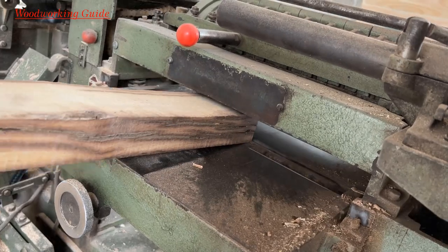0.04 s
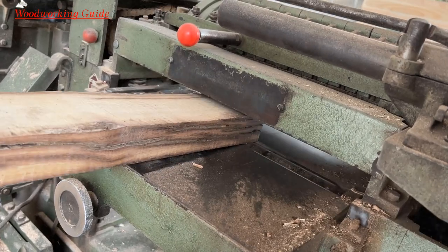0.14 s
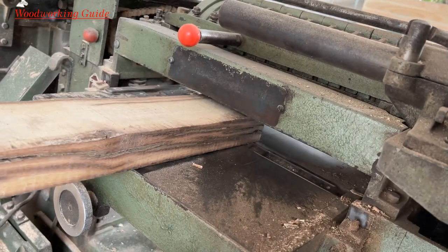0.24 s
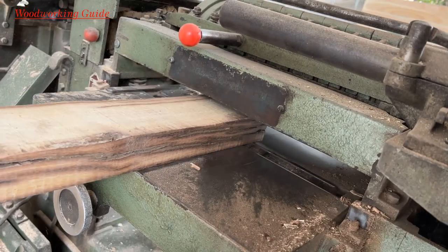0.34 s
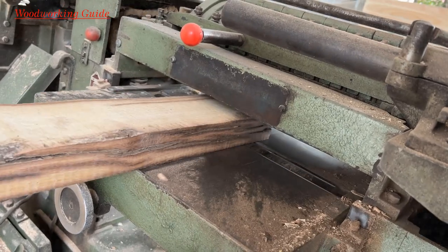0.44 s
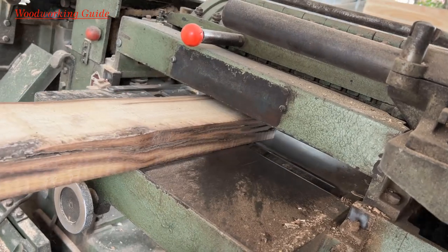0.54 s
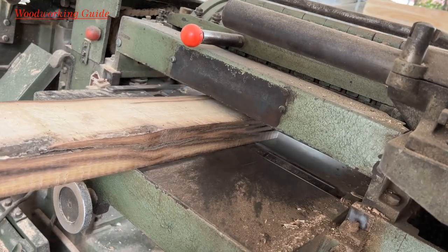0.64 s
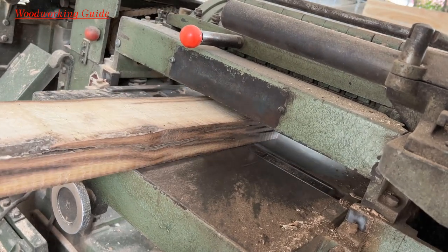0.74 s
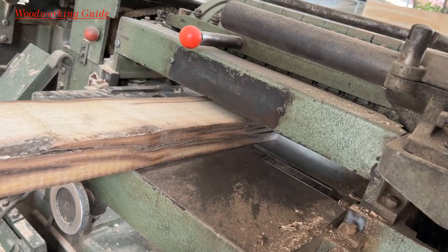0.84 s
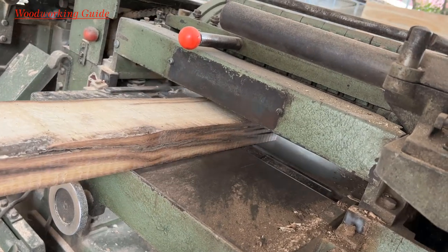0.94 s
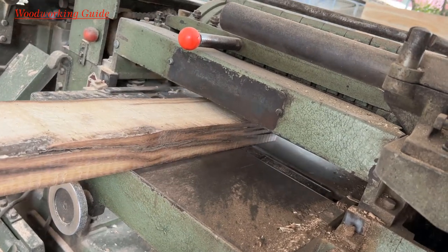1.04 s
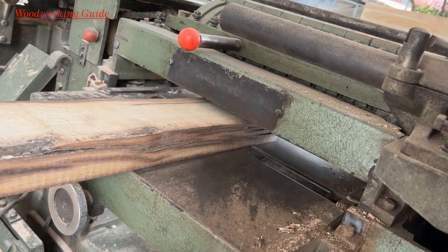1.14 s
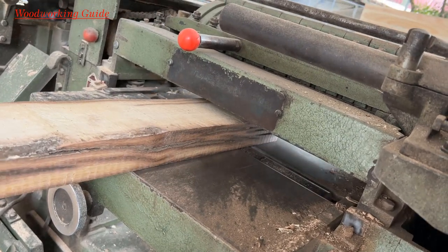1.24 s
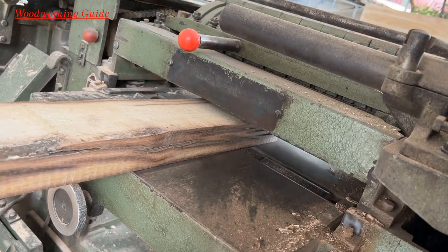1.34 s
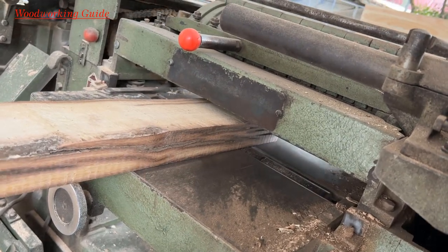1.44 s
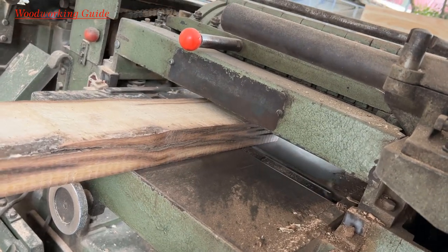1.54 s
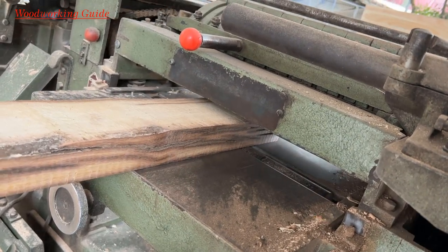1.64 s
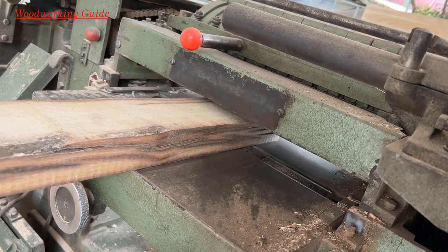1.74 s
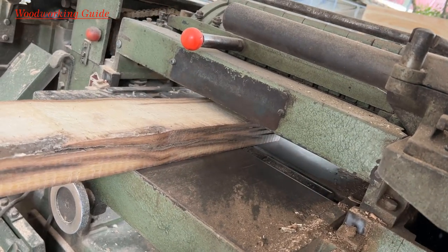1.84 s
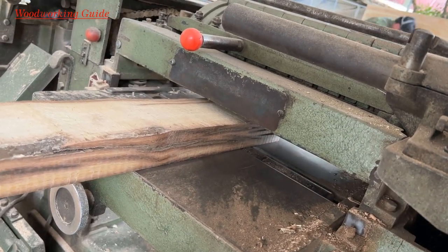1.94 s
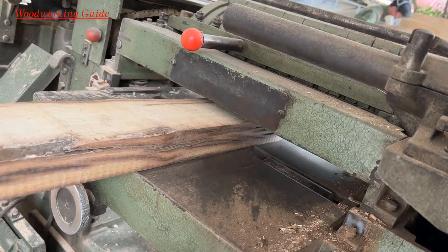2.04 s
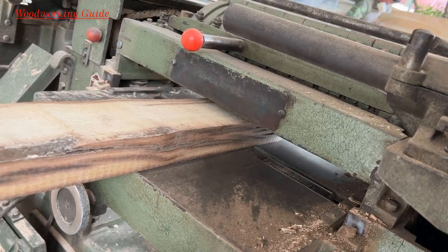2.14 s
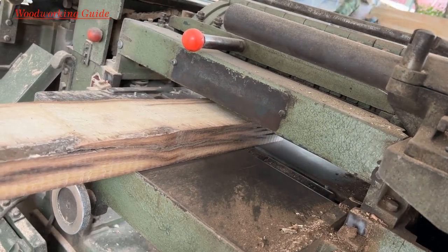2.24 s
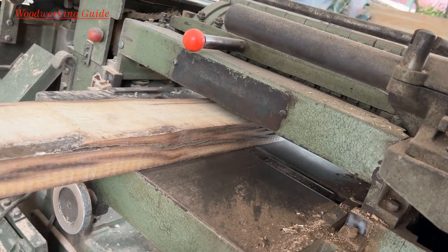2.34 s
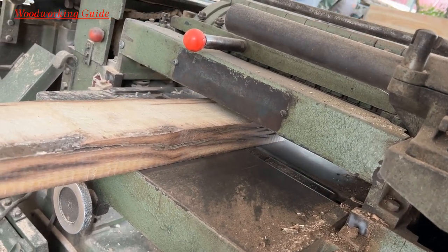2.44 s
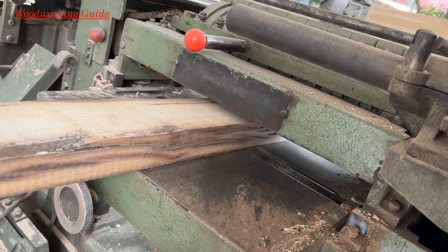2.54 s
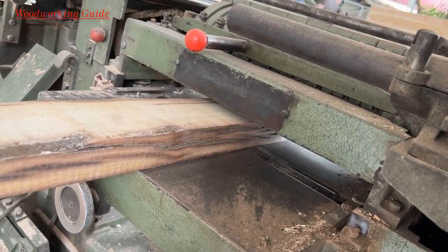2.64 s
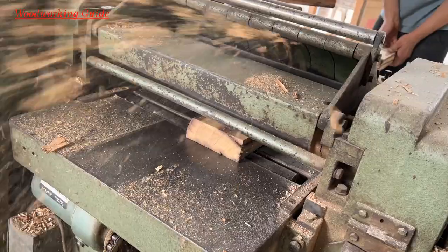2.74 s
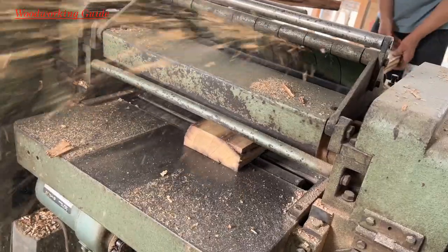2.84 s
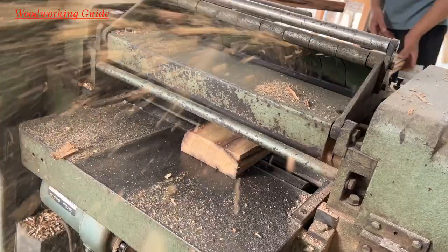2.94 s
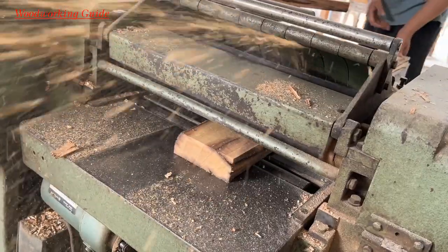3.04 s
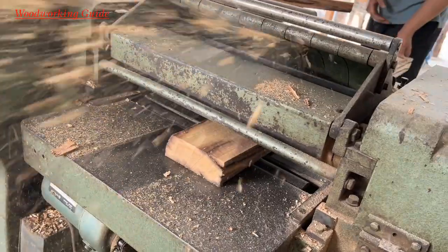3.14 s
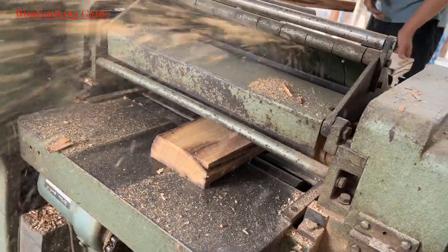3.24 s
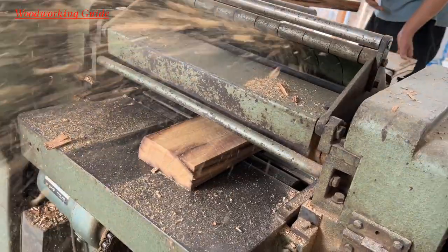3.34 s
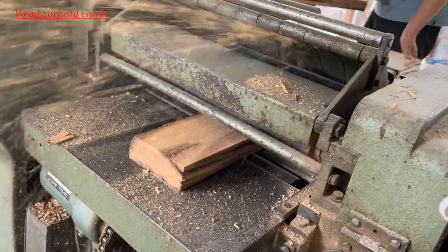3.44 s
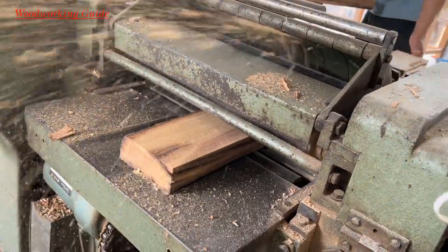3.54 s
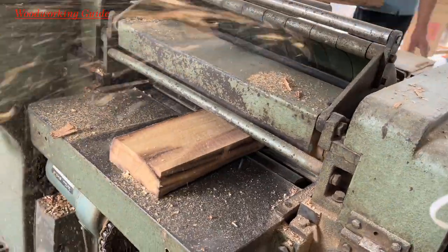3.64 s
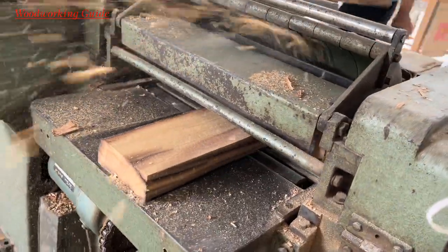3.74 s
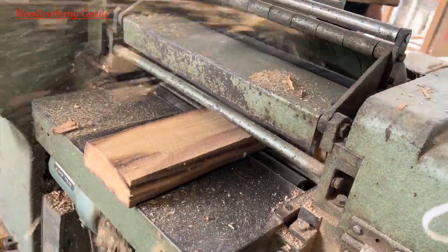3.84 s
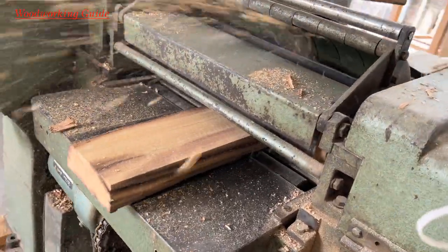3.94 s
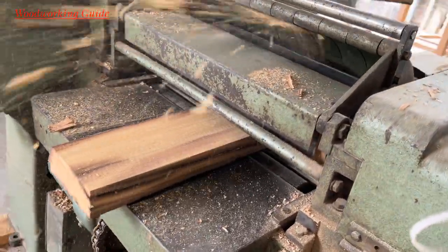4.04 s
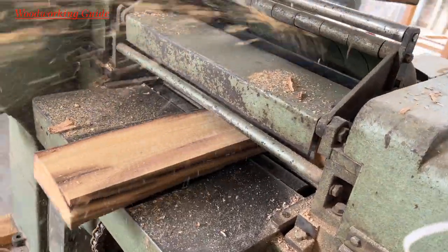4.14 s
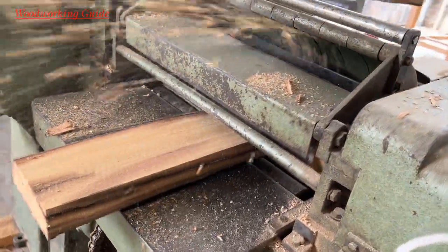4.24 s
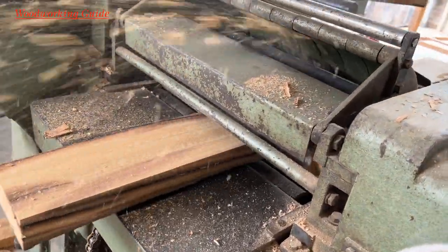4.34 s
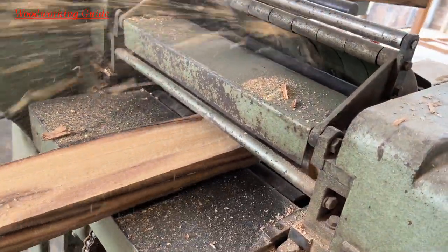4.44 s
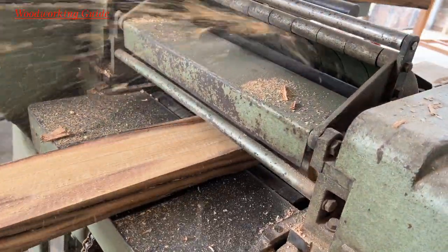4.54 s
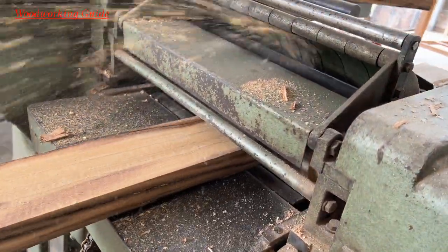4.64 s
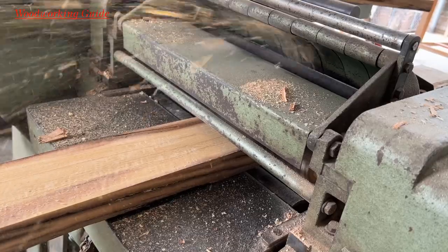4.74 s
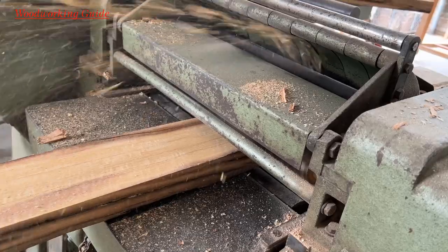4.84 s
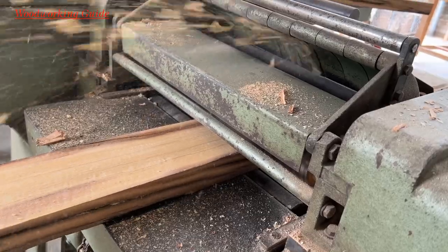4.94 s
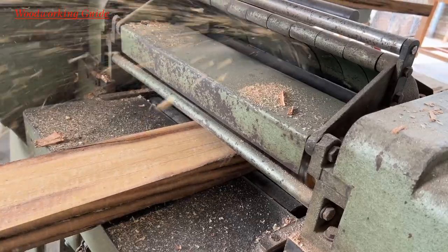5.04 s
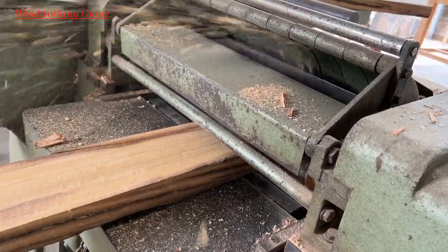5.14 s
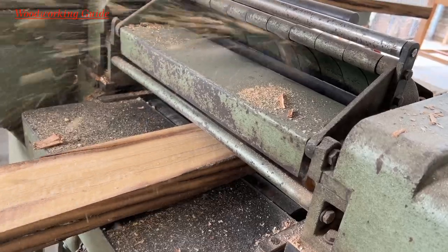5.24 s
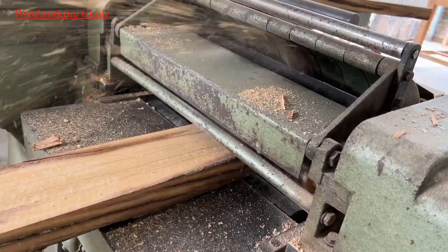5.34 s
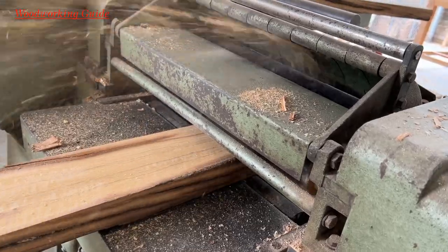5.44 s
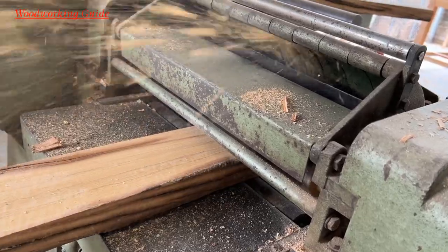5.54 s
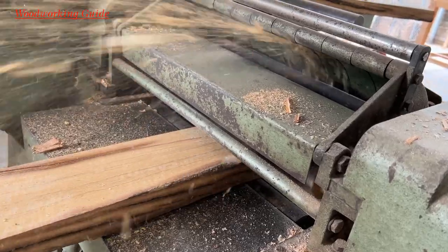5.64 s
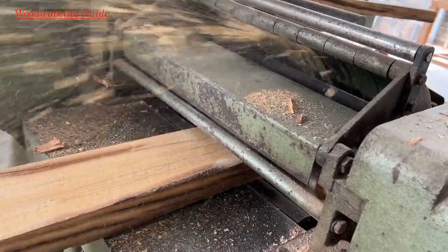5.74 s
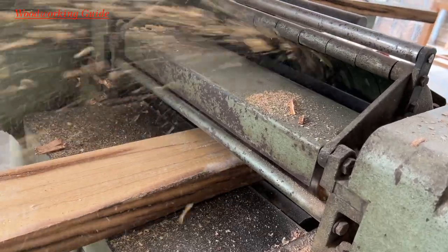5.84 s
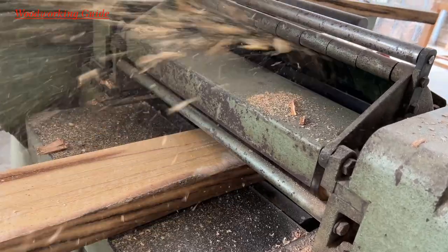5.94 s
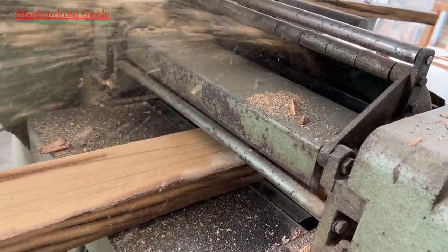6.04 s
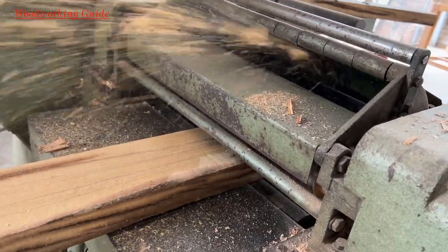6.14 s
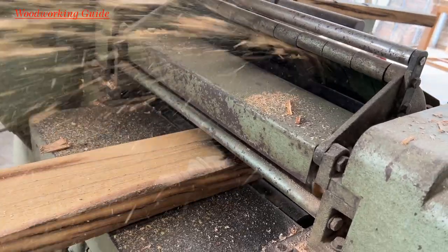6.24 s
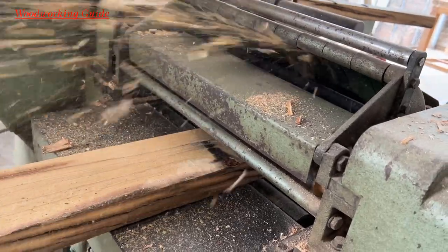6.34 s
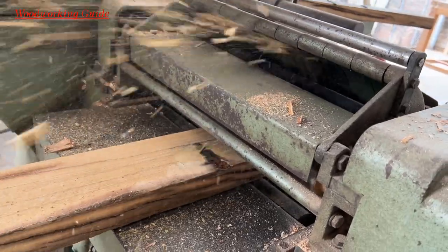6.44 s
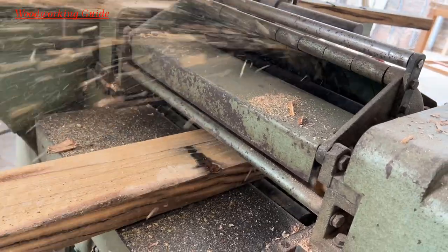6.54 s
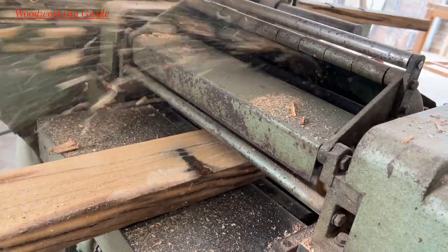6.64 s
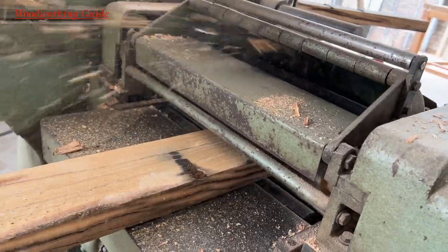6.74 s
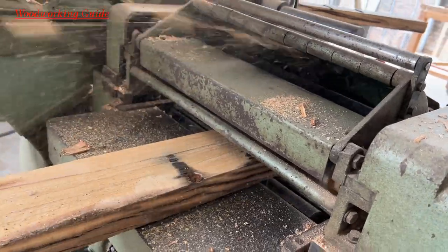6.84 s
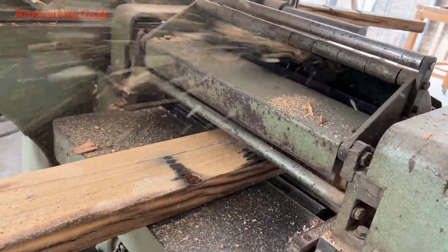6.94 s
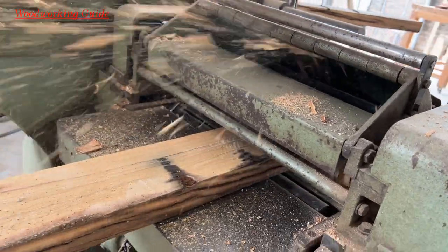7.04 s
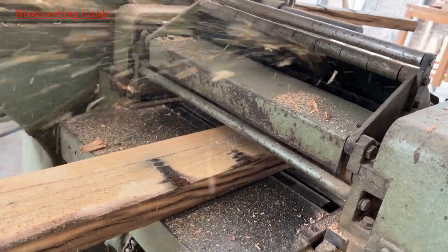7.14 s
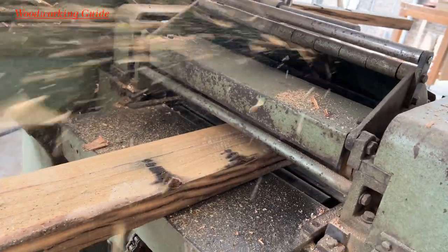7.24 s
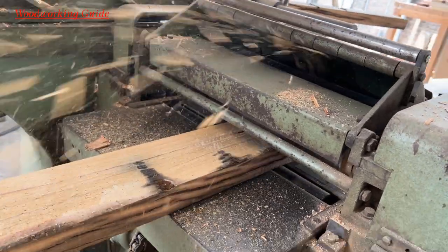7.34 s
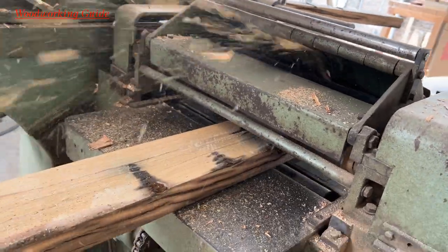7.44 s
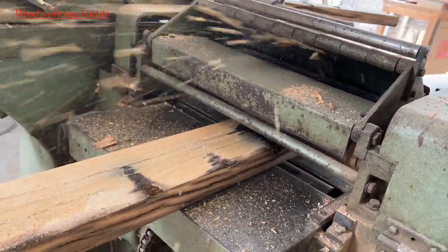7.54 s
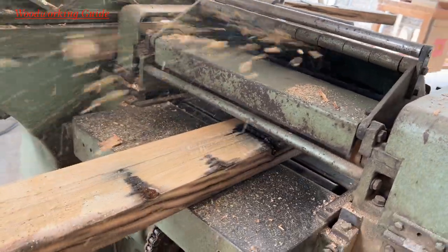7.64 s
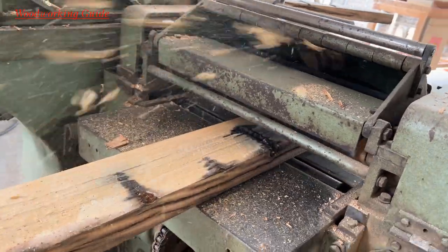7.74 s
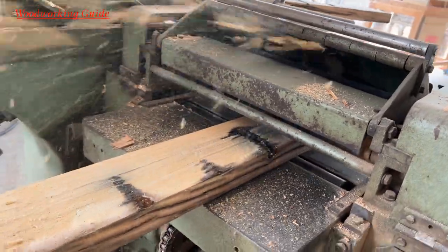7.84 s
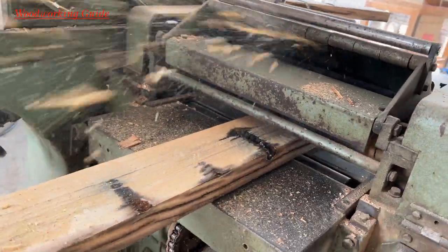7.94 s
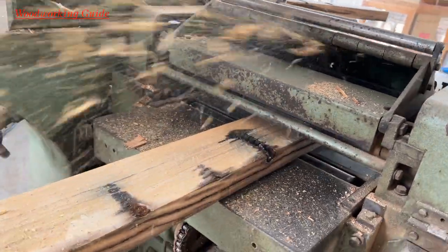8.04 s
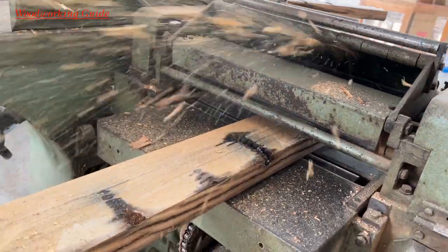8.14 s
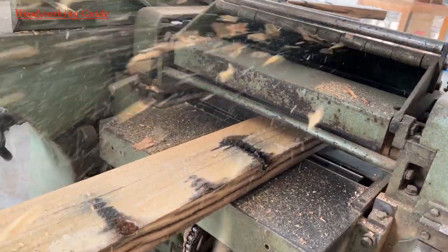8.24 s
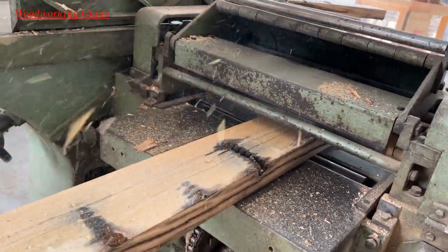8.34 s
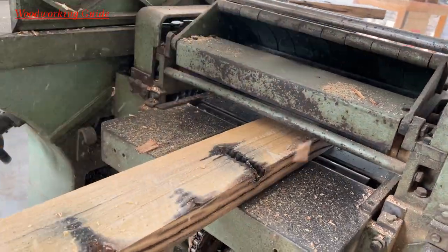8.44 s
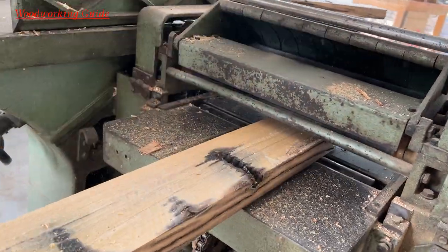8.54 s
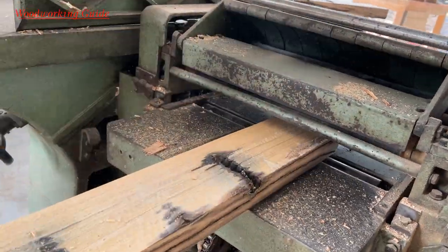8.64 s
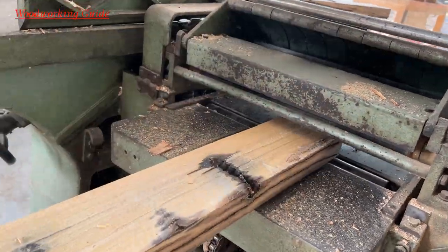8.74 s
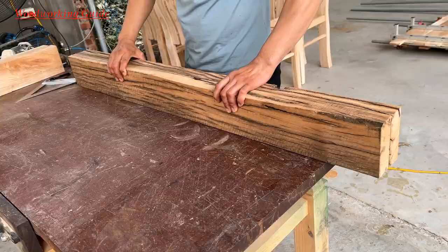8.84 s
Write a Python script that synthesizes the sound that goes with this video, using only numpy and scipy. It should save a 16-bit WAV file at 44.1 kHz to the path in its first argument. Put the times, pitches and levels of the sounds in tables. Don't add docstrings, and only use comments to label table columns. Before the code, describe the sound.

A thickness planer idles with a steady mid-pitched whine and airy rush, with a few dull wooden knocks. The board end brushes the cutter in bright scratchy buzzes, then the knives bite and a harsh, ringing, rapidly pulsing roar takes over. It wavers with the grain, cracks and thumps, then stops abruptly, leaving a quieter whine. Close stereo microphone in a workshop.

```python
import sys
import numpy as np
from scipy import signal
from scipy.fft import rfft, irfft, next_fast_len
from scipy.io import wavfile
from scipy.ndimage import uniform_filter1d

SR = 44100
rng = np.random.default_rng(int(sys.argv[2]) if len(sys.argv) > 2 else 0)


def wav_out(sig):
    wavfile.write(sys.argv[1], SR, np.round(np.clip(np.atleast_2d(sig).T, -1, 1) * 32767).astype(np.int16))


def natural_amplitude(level_db):
    exponent = np.asarray(level_db, float) / 20
    return 10 ** exponent


N = 391608

MOVE_S = 2.733
BITE_S, LEAVE_S, LEAVE_FADE_S = 2.09, 8.3, 0.032


def evened(x):
    return x / np.sqrt(np.mean(x ** 2) + 1e-20)


def read(points, hz):
    f, value = np.transpose(points)
    return np.interp(np.log(hz + 1), np.log(f + 1), value)


def curves(rows, t):
    s, *columns = np.transpose(rows)
    return [np.interp(t, s, c) for c in columns]


def spells(rows, t, edge_s, floor_db):
    start, length, *columns = (c[:, None] for c in np.transpose(rows))
    on = np.clip(np.minimum(t - start, start + length - t) / edge_s + .5, 0, 1)
    return [10 * np.log10((on * natural_amplitude(2 * c)).sum(0) + natural_amplitude(2 * floor_db)) for c in columns]


def both(a_db, b_db):
    return 10 * np.log10(natural_amplitude(2 * a_db) + natural_amplitude(2 * b_db))


def bump(hz, centre_hz, width_hz):
    return 1 / (1 + ((hz - centre_hz) / width_hz) ** 2)


def add(mix, s, sound):
    part = mix[..., round(s * SR):][..., :sound.shape[-1]]
    part += sound[..., :part.shape[-1]]


def loaded(t):
    return np.clip(np.minimum(t - BITE_S, LEAVE_S + LEAVE_FADE_S - t) / LEAVE_FADE_S, 0, 1)


def causal(db):
    fold = irfft(np.maximum(db, -100) * np.log(10) / 20)
    half = fold.shape[-1] // 2
    fold[..., 1:half] *= 2
    fold[..., half + 1:] = 0
    return rfft(fold).imag


def pair(a, b, same):
    same = np.clip(same, 0, 1)
    return np.array([a, same * a + np.sqrt(1 - same ** 2) * b])


# f/Hz, likeness [0-1]
SAME = [(60, 1), (130, 1), (290, 1), (640, 0.75), (1410, 0.056), (3100, 0.71), (6820, 0.065), (15000, 0.14)]


def wash(db, patchy_db):
    frames, hz = N // 256 + 5, np.fft.rfftfreq(1024, 1 / SR)
    a, b, c, d, patches = rng.standard_normal((frames, 513, 5)).T
    patches = uniform_filter1d(patches, size=10, axis=0)
    patches = evened(uniform_filter1d(patches, size=10, axis=1))
    level = natural_amplitude(db(hz)[:, None] + patchy_db * patches)
    z = pair(a + 1j * b, c + 1j * d, read(SAME, hz)[:, None]) * level
    return evened(signal.istft(z, nperseg=1024, noverlap=768)[1][:, :N])


# t/s (from), speed [turns per s]
SPEED = [(0, 103.058), (2.07, 102.963), (2.7, 102.504), (2.96, 102.706), (4.2, 102.86), (4.7, 103.043),
         (5.4, 102.852), (5.65, 102.769), (6.45, 103.0), (6.85, 102.965), (7.8, 102.885), (8.0, 102.687),
         (8.3, 103.297)]


def shaft(t):
    s, speed = np.transpose(SPEED)
    steps = speed[np.digitize(t, s) - 1]
    return -.092 + np.cumsum(uniform_filter1d(steps, size=9000)) / SR


# multiple [of shaft rate], level/dB
WHINE_IN = [(1, -17), (2, -13), (3, 1.5), (4, -60), (5, -37), (6, -5.5), (7, -51), (8, -22), (9, -11),
            (10, -52), (11, -23), (12, -6.5), (13, -26), (14, -39), (15, -12)]
# multiple [of shaft rate], level/dB
WHINE_OUT = [(1, -22), (2, -20), (3, 0), (4, -54), (5, -14), (6, -6.5), (7, -60), (8, -32), (9, -3.5),
             (10, -60), (11, -40), (12, -2), (13, -60), (14, -25), (15, -12)]


def knife_whine(t):
    (_, second_db, third_db), load = curves(GRIP, t), loaded(t)
    moved, turns, out = t > MOVE_S, shaft(t), np.zeros((2, N))
    sides = np.array([[1], [-1]])
    for (k, in_db), (_, out_db) in zip(WHINE_IN, WHINE_OUT):
        slow = rng.standard_normal((2, 300))
        waver_db, slip = (np.interp(t, np.linspace(0, t[-1], 300), row) for row in slow)
        swell_db = 3 * np.interp(t, np.linspace(0, t[-1], 30), slow[0, :30])
        phase = 2 * np.pi * (k * turns + rng.random() + 0.033 * slip + 0.0071 * k * sides)
        grip_db = (k == 6) * second_db + (k == 9) * third_db
        load_db = ((k > 6) * swell_db - 18 * (k == 12)) * load
        level_db = np.where(moved, out_db + grip_db + load_db, in_db)
        out += np.sqrt(2) * natural_amplitude(level_db + waver_db) * np.cos(phase)
    return natural_amplitude(1.7 * sides) * out


# f/Hz, level/dB
AIR_IN = [(40, -76), (95, -14), (250, -5.5), (420, -9.5), (800, -8), (1400, -6.5), (1700, -8), (1950, -12),
          (2250, -8.5), (3300, -7.5), (4500, -13), (7000, -19), (10000, -21.5), (15500, -20)]
# f/Hz, level/dB
AIR_OUT = [(50, -42), (95, -21), (250, -19), (420, -21), (800, -11), (1400, -10), (1700, -13), (1950, -21),
           (2200, -10), (3000, -13), (4700, -15.5), (9000, -17.5), (12500, -14), (15500, -11)]
# f/Hz, width [Hz], level/dB
FRAME_IN = [(345, 11, 1), (1091, 10, 3), (1408, 44, 7.5), (2762, 14, 5), (3090, 26, 2.5), (4850, 200, 4.5),
            (5400, 290, 6)]
# f/Hz, width [Hz], level/dB
FRAME_OUT = [(2745, 50, 13), (3570, 60, 15), (9600, 160, 11), (8000, 300, 6), (4400, 80, 6), (1096, 40, 6),
             (6100, 200, 3)]


def rushing_air(t):
    def blown(colour, frame, level_db):
        rings_db = lambda hz: sum(db * bump(hz, f, w / 2) for f, w, db in frame)
        return natural_amplitude(level_db) * wash(lambda hz: read(colour, hz) + rings_db(hz), patchy_db=1.2)

    moved, tear_db = t > MOVE_S, curves(CUT, t)[2]
    air_in, air_out = blown(AIR_IN, FRAME_IN, 5), blown(AIR_OUT, FRAME_OUT, 9)
    low_cut = signal.butter(4, 72, "highpass", fs=SR, output="sos")
    air = signal.sosfilt(low_cut, np.where(moved, air_out, air_in))
    chips = natural_amplitude(moved * (2 + 0.86 * (tear_db + 32.5))) * air_in
    b, a = signal.butter(2, [330, 5630], "bandpass", fs=SR)
    return air + (natural_amplitude(8 * loaded(t)) - 1) * signal.lfilter(b, a, chips)


# t/s, level/dB of the knife-pass tone
WHINE = [(0, -28), (.06, -32), (1.5, -33.5), (2.03, -33.5), (2.15, -39.5), (2.73, -44.5), (2.74, -43),
         (3.65, -44.5), (4.1, -42), (5.0, -45.5), (5.5, -43.5), (6.0, -44), (6.9, -45), (7.4, -44),
         (8.3, -45), (8.6, -47.5), (8.88, -46.5)]
# t/s, level/dB
BRUSH = [
    (1.25, -72),
    (1.35, -42),
    (1.7, -44),
    (2.05, -41),
    (2.1, -70),
]


def idle(t):
    brush = np.cos(2 * np.pi * 21 * shaft(t))
    brush *= np.sqrt(2) * natural_amplitude(curves(BRUSH, t)[0])
    return natural_amplitude(curves(WHINE, t)[0]) * (knife_whine(t) + rushing_air(t)) + brush


def strike_times(t, t0, t1, lead):
    turns = shaft(t) + lead
    s = np.interp(np.arange(np.ceil(turns[0]), turns[-1]), turns, t)
    return s[(s > t0) & (s < t1)]


def strikes(s, colour_db, edges_hz, bands_db, repeat, build_ms, smear_ms, rise_ms, ring_ms, tail_ms, tail_db,
            echo_db, memory, uneven_db, hard_db=0, early_ms=0):
    size = 1024
    hz, ms = np.fft.rfftfreq(size, 1 / SR), np.arange(size) * 1000 / SR
    fall = np.exp(-ms / ring_ms) + natural_amplitude(tail_db) * np.exp(-ms / tail_ms)
    shape = (1 - np.exp(-ms / rise_ms)) * fall
    shape /= np.linalg.norm(shape)
    drift, fresh, own = rng.standard_normal((len(s), 3, 2, size)).transpose(1, 2, 0, 3)
    drift = signal.lfilter([np.sqrt(1 - memory ** 2)], [1, -memory], drift[0], axis=0)
    blow = 1 + natural_amplitude(echo_db) * rfft(drift * shape)
    crisp = shape * np.exp(-ms / 2.2)
    crisp /= np.linalg.norm(crisp)
    high = 1 / (1 + (7000 / (hz + 1)) ** 2)
    mixed = np.sqrt(1 - high) * rfft(fresh * shape) + np.sqrt(high) * rfft(fresh[:, ::-1] * crisp)
    splinters = pair(*mixed, .52)
    share = np.clip(read(repeat, hz), 0, 1)
    field_db = colour_db(hz) + np.zeros((len(s), 1))
    band = np.digitize(hz, edges_hz[1:-1])
    inside = (hz > edges_hz[0]) & (hz < edges_hz[-1])
    loud = 1 + natural_amplitude(2 * echo_db)
    heard = natural_amplitude(2 * field_db) * (share * abs(blow) ** 2 / loud + 0.77 * (1 - share))
    power = np.array([heard[:, inside & (band == k)].sum(1) for k in range(len(bands_db))])
    strikes_per_s = 102.9
    lift_db = np.array(bands_db) - 10 * np.log10(power * 2 / size * strikes_per_s / SR)
    field_db += uniform_filter1d(lift_db.T[:, band], size=14, axis=1)
    smear = evened(uniform_filter1d(rng.standard_normal(len(hz)), size=9))
    late_ms = build_ms - early_ms * (hz > 2650) + smear_ms * smear
    swelling = np.exp(1j * causal(field_db) - 2j * np.pi * np.cumsum(late_ms) * hz[1] / 1000)
    bite = natural_amplitude(np.where(hard_db, hard_db, uneven_db * np.minimum(own[0, :, :1], 1)))
    repeated = np.sqrt(share * bite ** 0.51 / loud) * blow * swelling
    z = natural_amplitude(field_db) * (repeated + np.sqrt(1 - share) * bite * splinters)
    z *= np.exp(-2j * np.pi * hz * (s - np.round(s * SR) / SR + .002)[:, None])
    out = np.zeros((2, N))
    for at, burst in zip(s, irfft(z).transpose(1, 0, 2)):
        add(out, np.round(at * SR) / SR - 88 / SR, burst)
    return out


# f/Hz, level/dB
SKIM_COLOUR = [(530, -42), (900, -5), (1180, -16), (1670, -8.5), (1900, -10), (2270, -4), (2700, -8.5),
               (3880, -13), (4600, -12.5), (5200, -12), (6400, -6.5), (7400, -15.5), (10600, -18),
               (13400, -15), (14200, -17), (15400, -23)]
# f/Hz, share [0-1]
SKIM_REPEAT = [(1000, .9), (4500, .92), (6000, .78), (9000, .62), (15000, .5)]
# t/s (start), length [s], level/dB, brightness [dB]
TOUCHES = [(1.251, 0.019, -25, 4), (1.269, .02, -32, 3), (1.302, 0.18, -41.5, 8), (1.493, .23, -39, 14),
           (1.765, 0.098, -31, 11.5), (1.795, 0.011, -24, -1), (1.865, 0.057, -39, 12),
           (1.924, 0.1, -30.5, 9), (2.05, 0.006, -22, 2), (2.067, .006, -18, -11), (2.036, 0.14, -33, 10),
           (2.086, 0.018, -21, -1), (2.113, 0.26, -24, 4.5), (2.32, 0.089, -28.5, -12),
           (2.377, 0.41, -25, -4.5), (2.673, 0.053, -29, -11)]
# t/s, f/Hz, level/dB
SKIM_RING = [
    (2.06, 4250, 2),
    (2.105, 4200, 11),
    (2.125, 3400, 13),
    (2.17, 3700, 7),
    (2.28, 3750, 6),
    (2.33, 3720, 11),
    (2.44, 4050, 9),
    (2.73, 3980, 8.5),
]


def skim(t):
    s = strike_times(t, TOUCHES[0][0], MOVE_S, lead=.2)
    rows = [(at, length, db - 8 - 0.76 * bright, db, db - 12 + bright) for at, length, db, bright in TOUCHES]
    ring_hz, ring_db = (c[:, None] for c in curves(SKIM_RING, s))
    colour_db = lambda hz: read(SKIM_COLOUR, hz) + ring_db * bump(hz, ring_hz, 420)
    bands_db = spells(rows, s, edge_s=0.0041, floor_db=-45.5)
    return strikes(s, colour_db, (900, 3000, 9800, 15500), bands_db, SKIM_REPEAT, build_ms=0.617, smear_ms=0.79,
                   rise_ms=0.063, ring_ms=3.4, tail_ms=11.8, tail_db=-11.0, echo_db=-5, memory=.95,
                   uneven_db=-1.0)


# t/s, board ring level/dB, board ring f/Hz, tearing level/dB
CUT = [(2.73, -33, 2280, -30), (2.8, -31, 2300, -34.5), (3.08, -27, 2320, -33.5), (3.35, -27.5, 2340, -34),
       (3.58, -29.5, 2320, -34.5), (3.75, -25.5, 2240, -35), (4.1, -28.5, 2160, -34.5),
       (4.31, -33.5, 2000, -36), (4.6, -27.5, 2200, -35.5), (5.1, -32.5, 2370, -37.5),
       (5.28, -31.5, 2310, -39.5), (5.42, -37, 2070, -36), (5.62, -32, 2100, -33.5),
       (5.7, -29, 2240, -33.5), (5.9, -27.5, 2260, -36), (5.97, -33, 2190, -35), (6.15, -30.5, 2240, -33.5),
       (6.35, -31, 2360, -36.5), (6.58, -31.5, 2130, -38), (6.84, -31, 2190, -35), (7.15, -32, 2500, -35),
       (7.39, -25.5, 2400, -35.5), (7.5, -25, 2490, -36), (7.68, -25.5, 2370, -34.5),
       (7.76, -32.5, 2320, -32.5), (8.09, -18.5, 2490, -33), (8.15, -34, 2200, -31)]
# f/Hz, level/dB
CUT_COLOUR = [(180, -25.5), (300, -10), (424, -15), (630, -10.5), (755, -19.5), (1000, -13.5),
              (1580, -21.5), (1750, -10.5), (1900, -14), (2390, -7.5), (2730, -7), (3440, 1), (4470, -6),
              (7460, -11), (15400, -11.5)]
# f/Hz, share [0-1]
CUT_REPEAT = [(1000, .93), (2600, .95), (3200, .85), (3800, .7), (4800, .2), (15000, .1)]
# t/s (start), length [s], low modes level/dB, upper ring level/dB, upper ring f/Hz
KNOTS = [(2.735, 0.07, -32, -30, 3380), (2.795, 1.4, -41, -37, 3210), (3.625, 0.34, -33.5, -47, 3350),
         (4.416, 0.36, -38.5, -39, 3430), (4.89, 0.52, -46, -40.5, 2680), (5.347, 0.34, -35.5, -34.5, 3390),
         (5.973, 0.32, -39, -41, 3470), (6.256, 0.17, -46, -32, 2810), (6.392, 0.15, -57, -34.5, 3300),
         (6.9, 0.35, -56, -33.5, 3360), (7.235, 0.19, -38, -37, 3000), (7.553, 0.14, -44, -33, 3180),
         (7.71, 0.047, -40, -26, 3460), (7.765, 0.3, -32, -34, 2860), (8.096, 0.095, -23.5, -28, 3420),
         (8.13, 0.2, -35, -28, 3570), (8.2, 0.088, -25.5, -27, 3480)]
# t/s (start), length [s], level/dB
LOOSE_END = (8.205, 0.12, -28)
# t/s, peak level/dB
BITES = [(2.7942, -13), (2.8137, -8), (2.9209, -16), (2.9499, -13), (3.0472, -17), (3.1838, -15),
         (3.2522, -18), (3.34, -19), (3.3789, -14), (3.4078, -9), (3.4562, -12), (3.5829, -15),
         (3.6024, -15), (3.6223, -19), (3.6702, -19), (3.758, -12), (3.8264, -14), (4.1182, -10),
         (4.2444, -15), (4.5657, -12), (5.0706, -14), (5.2352, -11), (5.3419, -9), (5.4103, -24),
         (5.4881, -13), (5.5071, -11), (5.6727, -10), (5.8867, -18), (5.9645, -18), (6.1885, -13),
         (6.2663, -13), (6.2953, -16), (6.3347, -10), (6.4414, -14), (6.6355, -13), (6.655, -14),
         (6.6739, -18), (6.9368, -12.5), (7.1209, -10), (7.1698, -10), (7.2471, -20), (7.4417, -14),
         (7.752, -16), (8.2089, -19), (2.98, -17), (3.155, -22), (3.204, -16), (3.282, -18), (3.399, -19),
         (4.624, -16), (5.362, -19), (5.566, -17), (6.043, -8), (6.946, -11), (7.452, -16), (7.617, -16),
         (7.733, -25), (7.878, -16), (8.306, -12.5), (8.316, -6)]
# t/s (start), length [s], level/dB, ring f/Hz
TEARS = [(4.503, 0.14, -41, 5500), (4.87, 0.08, -37.5, 6000), (5.33, 0.28, -40, 5600),
         (5.845, 0.31, -37.5, 6150), (6.257, 0.089, -40, 5000), (6.633, 0.11, -37, 5840),
         (6.7, 0.099, -41, 9900), (6.945, 0.084, -35, 4800), (7.004, 0.062, -36, 4600),
         (7.15, 0.038, -34, 4970), (7.233, 0.033, -34, 5600)]
# t/s, ring width [Hz], second knife-pass overtone level/dB, third level/dB
GRIP = [(2.73, 170, 8, -4), (3.0, 100, 9, -4), (3.58, 100, 9, -3), (3.7, 220, 8, -4), (4.3, 260, 7, -4),
        (4.6, 260, 8, -10), (5.3, 260, 8, -20), (5.5, 280, 7, -8), (5.9, 220, 6.5, -10), (6.1, 240, 8, 0),
        (6.3, 280, 8, -9), (6.8, 300, 6, -11), (7.0, 260, 9.5, -1), (7.4, 260, 9.5, -2),
        (7.8, 220, 10, -11), (8.12, 220, 12, -6), (8.2, 400, 12, -6), (8.32, 400, 9, -4), (8.36, 400, 5, 0)]


def cut(t):
    s = strike_times(t, MOVE_S, LEAVE_S + LEAVE_FADE_S, lead=.27)
    db, ring_hz, tear_db = curves(CUT, s)
    width_hz = curves(GRIP, s)[0][:, None]
    wander_db = evened(uniform_filter1d(rng.standard_normal((len(s), 4)), size=5, axis=0)).T
    low_db, upper_db = spells(np.array(KNOTS)[:, :4], s, edge_s=.02, floor_db=-67)
    weighted = [(at, length, level + 10 * np.log10(hz)) for at, length, _, level, hz in KNOTS]
    upper_hz = natural_amplitude(2 * (spells(weighted, s, edge_s=.02, floor_db=-32)[0] - upper_db))
    db = both(db, spells([LOOSE_END], s, edge_s=0.036, floor_db=-62)[0])
    torn_db = both(tear_db, spells(np.array(TEARS)[:, :3], s, edge_s=.02, floor_db=-67)[0])
    at, length, _, rings_hz = np.transpose(TEARS)
    torn_hz = rings_hz[abs(s[:, None] - at - length / 2).argmin(1)]
    upper_floor_db = tear_db - 2
    upper_gain_db = 12 / (1 + natural_amplitude(2 * (upper_floor_db - upper_db)))
    hard_db, usual_peak_db = np.zeros((len(s), 1)), -20.5
    for at, peak_db in BITES:
        nearest = np.argmin(abs(s - at))
        hard_db[nearest] = 0.6 * (peak_db - usual_peak_db - (torn_db - torn_db.mean())[nearest])
    dull_db = -5 * (s > 8.13)[:, None]

    def colour_db(hz):
        wood_db = read(CUT_COLOUR, hz) + dull_db * np.clip(np.log2((hz + 1) / 7000), 0, 1)
        board_db = 13 * bump(hz, ring_hz[:, None], width_hz)
        torn_ring_db = 2.4 * (torn_db - tear_db)[:, None] * bump(hz, torn_hz[:, None], 400)
        knot_db = upper_gain_db[:, None] * bump(hz, upper_hz[:, None], 100 + .5 * width_hz)
        return wood_db + board_db + torn_ring_db + knot_db

    bands_db = np.array([both(low_db, tear_db - 7), db, both(upper_db, upper_floor_db), torn_db]) + wander_db
    bed_db = tear_db + wander_db[-1] - 17
    fade_db = -17 * np.clip((s - LEAVE_S) / LEAVE_FADE_S, 0, 1) ** 2
    return strikes(s, colour_db, (350, 1000, 1900, 2600, 4300, 15500), np.vstack([bed_db, bands_db]) + fade_db,
                   CUT_REPEAT, build_ms=1.303, smear_ms=0.43, rise_ms=0.7, ring_ms=1.0, tail_ms=7.6, tail_db=3.0,
                   echo_db=-6.5, memory=0.755, uneven_db=3.5, hard_db=hard_db, early_ms=0.71)


# t/s (start), length [s], multiple [of shaft rate], level/dB
SINGING = [(2.1, 0.71, 16, -43), (2.4, 0.24, 15, -52), (2.4, 0.52, 14, -42), (2.74, 1.5, 5, -44.5),
           (2.735, 2.3, 4, -50.5), (2.737, 0.76, 7, -45), (2.74, .5, 11, -43.5), (2.74, 1.2, 12, -51.5),
           (2.74, 1.1, 13, -53), (2.737, 0.42, 17, -41.5), (3.6, 0.55, 19, -54), (4.206, 0.58, 11, -42),
           (4.5, .3, 13, -46), (4.55, 0.36, 14, -47), (4.797, 1.2, 17, -46), (5.4, 0.39, 11, -41),
           (5.4, 0.41, 13, -52), (6.0, .35, 11, -44), (6.0, 0.26, 5, -50), (6.002, 0.55, 8, -48),
           (6.1, 0.38, 14, -44), (6.552, .35, 18, -52), (6.55, 0.32, 17, -44.5), (6.9, 0.9, 12, -47),
           (6.902, .5, 13, -49), (6.89, 0.44, 8, -47), (7.206, 0.38, 11, -45.5), (7.25, 0.22, 17, -43),
           (7.707, 0.55, 8, -43), (7.8, 0.48, 11, -44), (7.8, 0.52, 14, -44), (7.8, 0.49, 15, -40),
           (8.102, 0.16, 12, -35.5), (4.2, 4.6, 5, -49.5), (4.6, 3.3, 4, -54), (2.802, 5.45, 12, -49.5),
           (6.75, 0.63, 27, -40), (2.78, 0.35, 28, -46), (3.95, 0.36, 26, -44), (3.5, 4.75, 7, -52.5),
           (2.74, 3, 8, -52)]


def singing(t):
    turns, out = shaft(t) + .2, np.zeros((2, N))
    for start, length, k, db in SINGING:
        span = slice(round((start - .08) * SR), round((start + length + .08) * SR))
        u, (waver, slip, side) = t[span], rng.standard_normal((3, 40))
        slow = lambda row: np.interp(u, start - 1 + np.arange(40) / 9, row)
        level_db = spells([(start, length, db)], u, edge_s=.14, floor_db=-100)[0] + 2.5 * slow(waver)
        apart = .005 * side[0] * np.array([[1], [-1]])
        phase = 2 * np.pi * (round(k) * turns[span] + 0.063 * slow(slip) + apart)
        out[:, span] += np.sqrt(2) * natural_amplitude(level_db) * np.cos(phase)
    return out


# t/s, peak level/dB, centre f/Hz, time to
# fall 60 dB [s]
KNOCKS = [
    (.003, -15, 350, .08),
    (.222, -17, 900, .08),
    (.4075, -7.5, 600, .13),
    (1.059, -6, 800, .14),
    (1.2605, -11, 3500, .03),
    (5.3415, -6, 4000, .02),
    (6.1408, -1, 800, .035),
    (1.061, -15, 3800, .05),
    (.216, -19, 3500, .04),
    (6.2665, -4, 3500, .025),
]


def knocks():
    out, u = np.zeros((2, N)), np.arange(6000) / SR
    for s, db, hz, t60 in KNOCKS:
        noise = rng.standard_normal((3, len(u)))
        b, a = signal.butter(1, [hz / 4, min(hz * 4, 20000)], "bandpass", fs=SR)
        body = evened(signal.lfilter(b, a, noise[0] + .5 * noise[1:]))
        add(out, s, natural_amplitude(db - 15.5 - 60 * u / t60) * (1 - np.exp(-u / 0.00098)) * body)
    return out


# t/s, peak level/dB, glide [cycles], push [s], after-ring level/dB
THUMPS = [
    (5.578, -24.5, 0.82, 0.013, -16),
    (5.6647, -10, 1, 0.012, -14.5),
    (6.1405, -16.5, 0.94, 0.013, -22),
]


def thumps():
    out, u = np.zeros(N), np.arange(5000) / SR
    for s, db, cycles, push, after_db in THUMPS:
        glide = np.sin(2 * np.pi * (cycles * np.log1p(u / .0007) + 30 * u)) / (1 + (u / push) ** 6)
        ring = natural_amplitude(after_db) * np.exp(-((u - .05) / 0.03) ** 2) * np.sin(2 * np.pi * 98 * u)
        add(out, s, natural_amplitude(db) * (1 - np.exp(-u / 0.0001)) * (glide + ring))
    return out


# t/s (start), length [s], deep
# level/dB, shudder level/dB
SHAKES = [
    (1.25, .06, -56, -57),
    (1.76, 0.082, -51, -44),
    (2.1, 0.44, -54, -47.5),
    (2.55, 1.25, -56, -71),
    (3.85, 2, -84, -52.5),
    (5.72, 0.06, -70, -43),
    (6.12, 0.06, -62, -45),
    (6.3, 1.12, -60, -74),
    (7.5, 0.68, -81, -52.5),
]


def rumble(t):
    deep_db, shudder_db = spells(SHAKES, t, edge_s=0.099, floor_db=-100)
    deep = wash(lambda hz: -30 * np.log10(1 + (hz / 70) ** 2), patchy_db=1.8)

    def shudder_colour_db(hz):
        hump_db = -9 * np.log10(1 + ((hz - 108) / 30) ** 2) - hz / 30
        return hump_db - 15 * np.log10(1 + (70 / (hz + 1)) ** 2) + 12 * bump(hz, 205, 30)

    shudder = wash(shudder_colour_db, patchy_db=1.0)
    load, near = loaded(t), t < MOVE_S
    deep_level = natural_amplitude(deep_db) + natural_amplitude(-80) * near + natural_amplitude(-75) * load
    shudder_level = natural_amplitude(shudder_db) + natural_amplitude(-70) * near + natural_amplitude(-60) * load
    return deep_level * deep + shudder_level * shudder


def scene():
    t = np.arange(N) / SR
    return idle(t) + skim(t) + cut(t) + singing(t) + knocks() + thumps() + rumble(t)


# f/Hz, level/dB
LEFT_DB = [(60, 0.14), (250, 0.095), (550, 0.049), (1650, 1.2), (4970, 3.55), (15000, 6.5)]
# f/Hz, phase [radians]
LEFT_LEADS = [(60, -0.25), (300, -0.35), (950, -0.2), (2400, -0.86), (3800, -1.14), (4400, 1.87),
              (8000, 0.95), (15000, 1.2)]


def microphone(dry):
    size, ceiling = next_fast_len(N), .85
    hz = np.fft.rfftfreq(size, 1 / SR)
    half = np.array([[.5], [-.5]])
    ports = natural_amplitude(read(LEFT_DB, hz) * half) * np.exp(1j * read(LEFT_LEADS, hz) * half)
    limit = 1 / (1 + (hz / 15730) ** 300)
    pressed = ceiling * np.tanh(dry / ceiling)
    return irfft(rfft(pressed, size) * ports * limit, size)[:, :N]


def band_limit(x):
    return signal.sosfilt(signal.butter(12, 16920, fs=SR, output="sos"), x)


def record(dry):
    mix = microphone(dry)
    return band_limit(mix)


dry = scene()
out = record(dry)
wav_out(out)
```